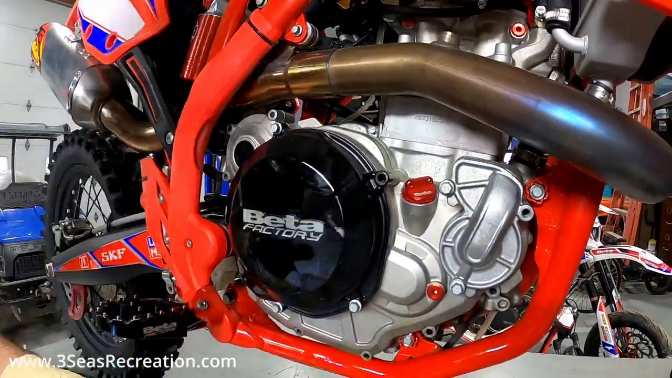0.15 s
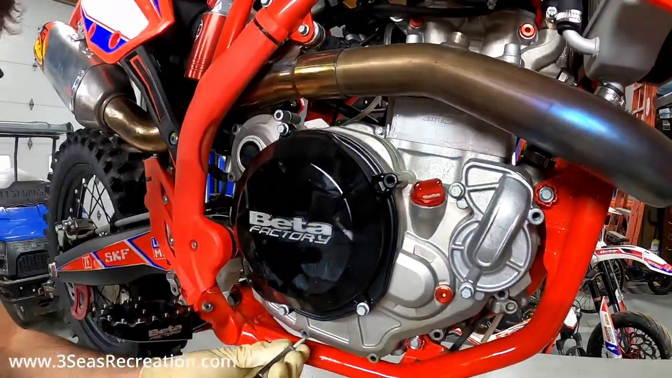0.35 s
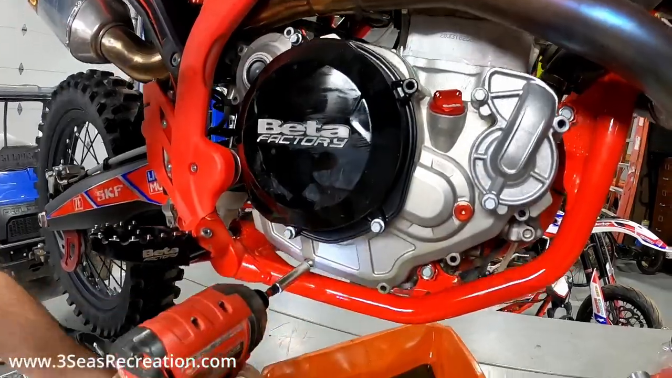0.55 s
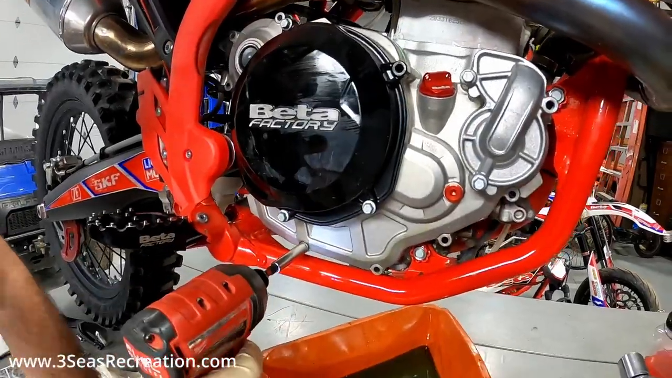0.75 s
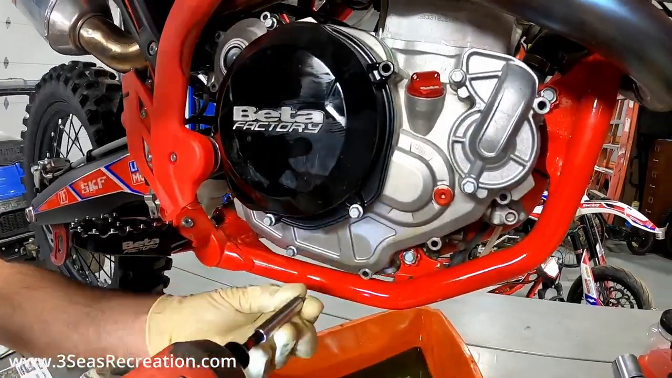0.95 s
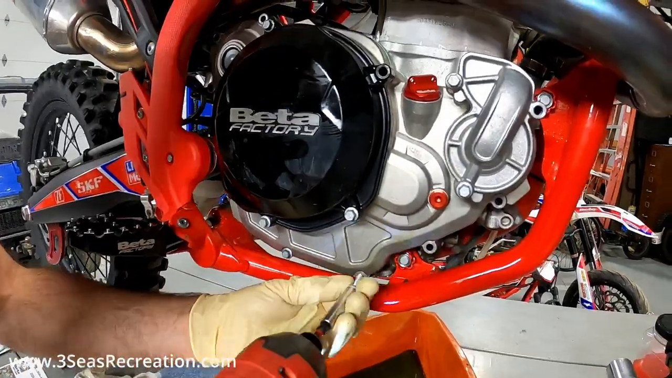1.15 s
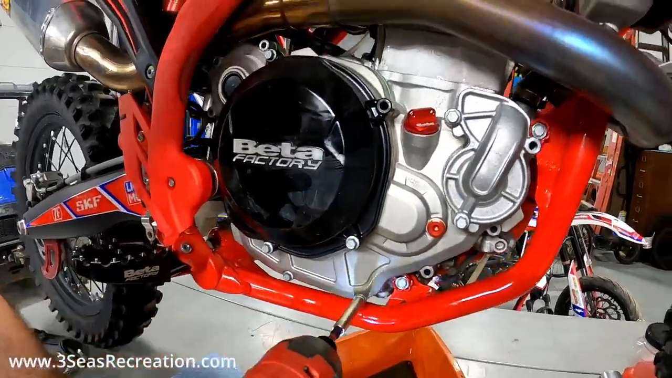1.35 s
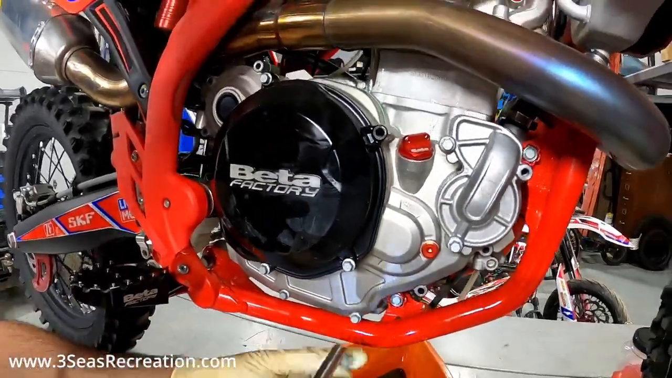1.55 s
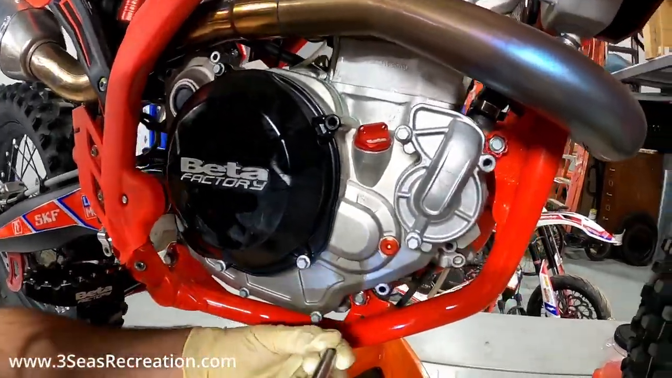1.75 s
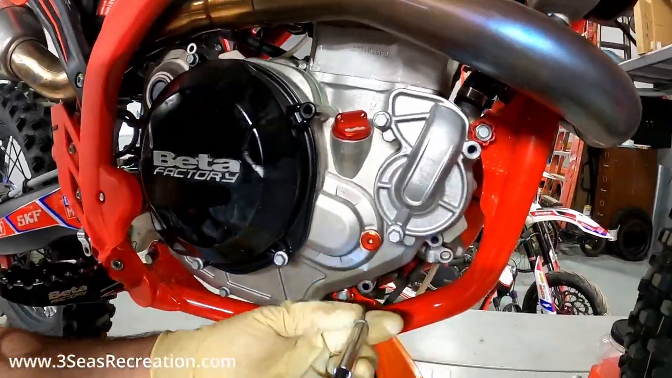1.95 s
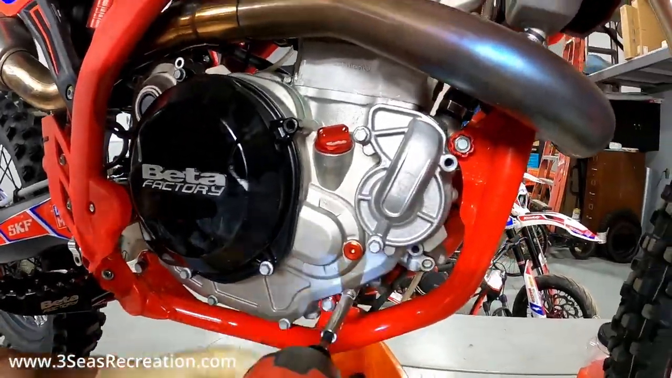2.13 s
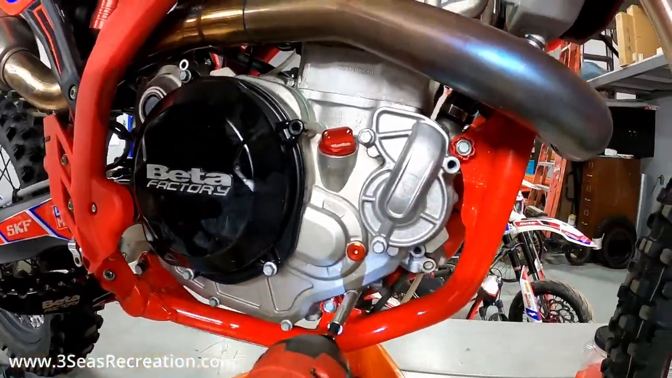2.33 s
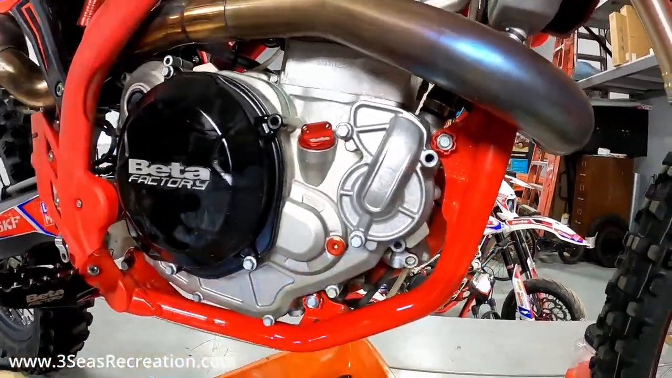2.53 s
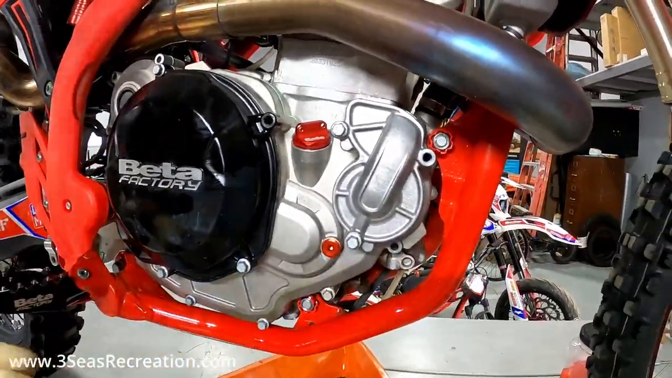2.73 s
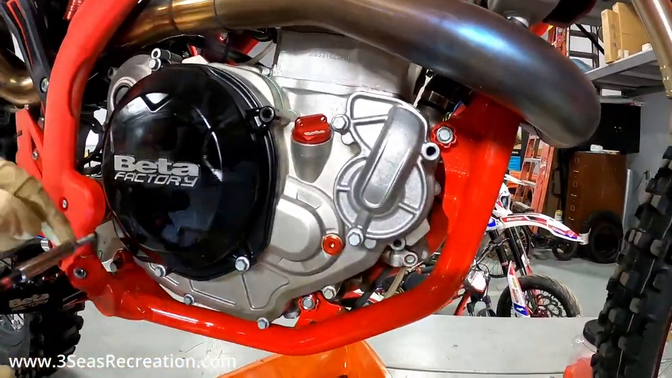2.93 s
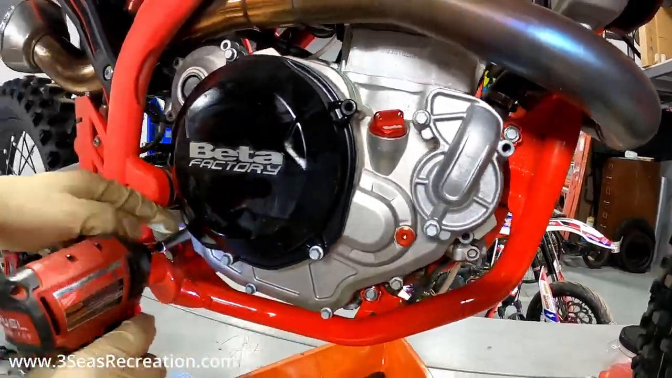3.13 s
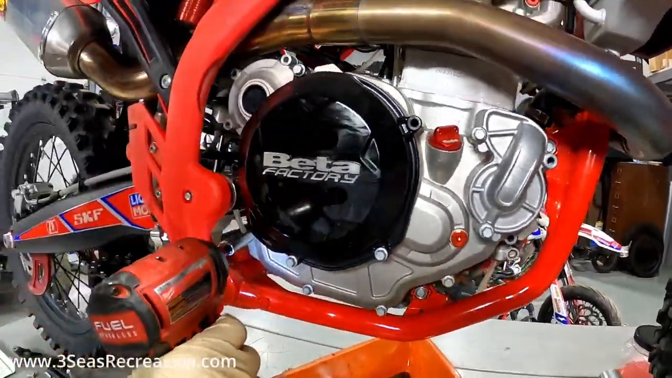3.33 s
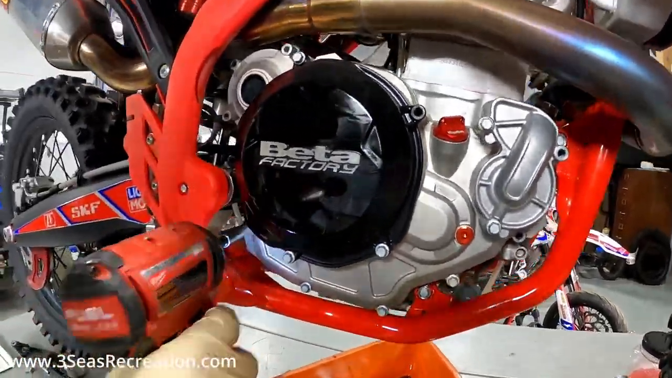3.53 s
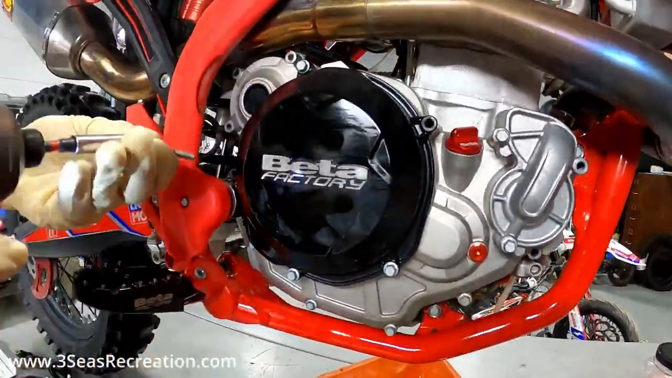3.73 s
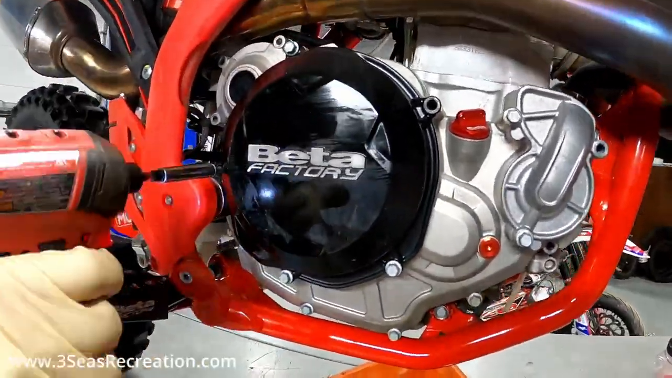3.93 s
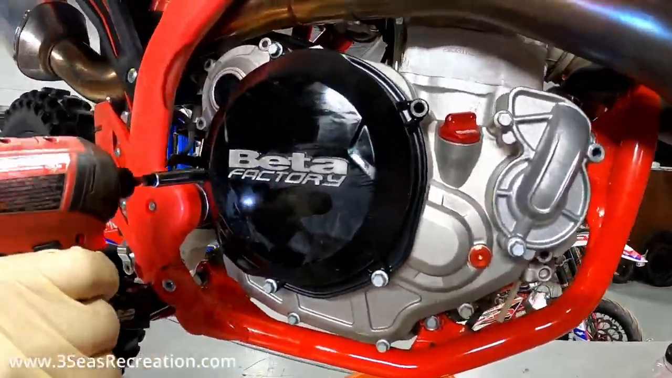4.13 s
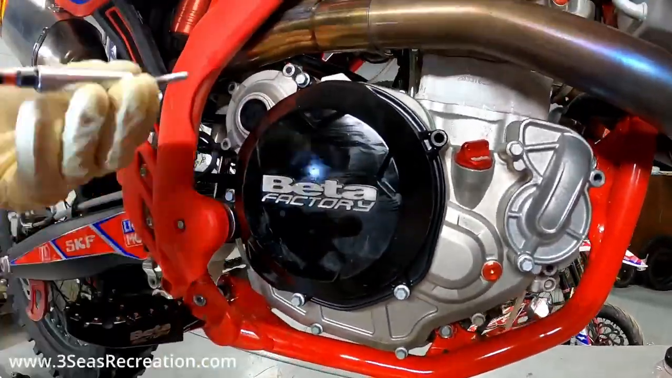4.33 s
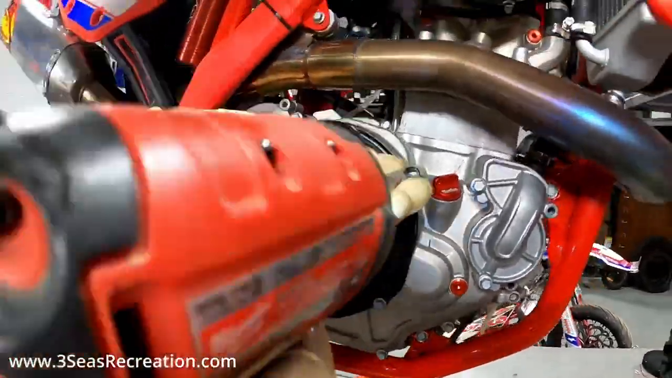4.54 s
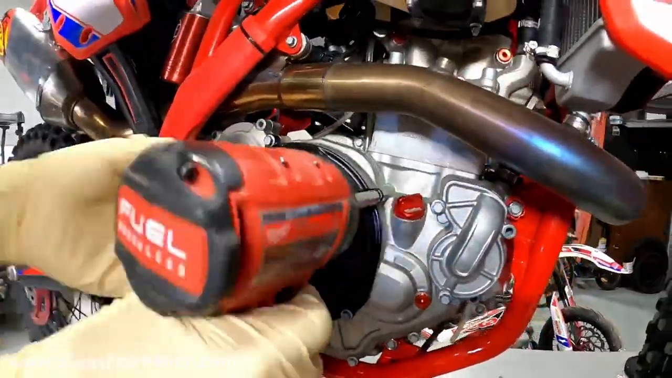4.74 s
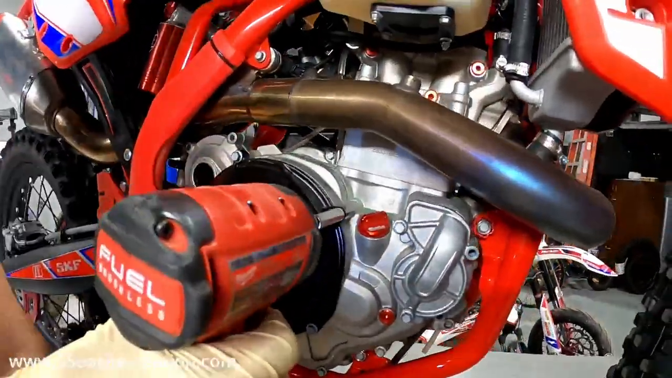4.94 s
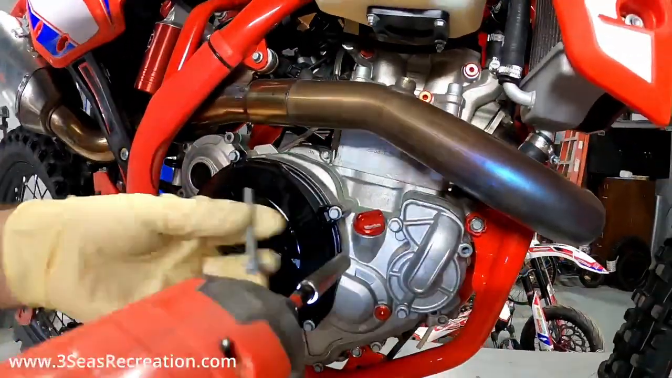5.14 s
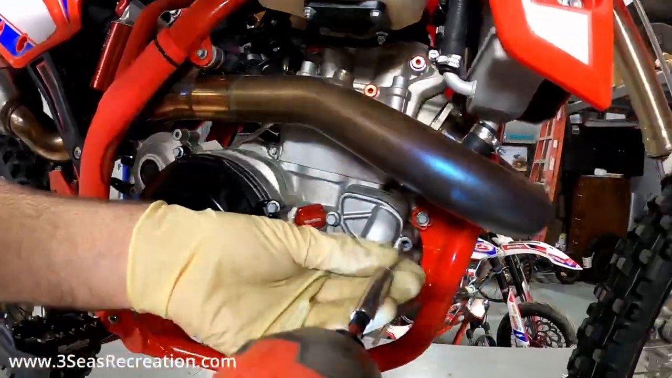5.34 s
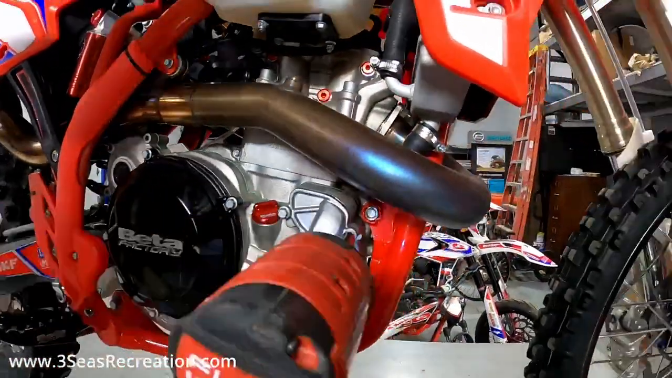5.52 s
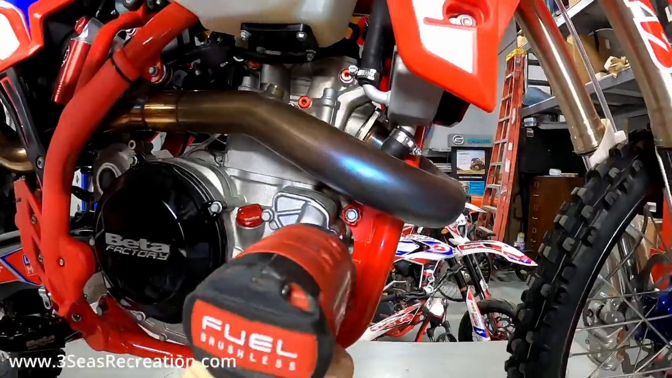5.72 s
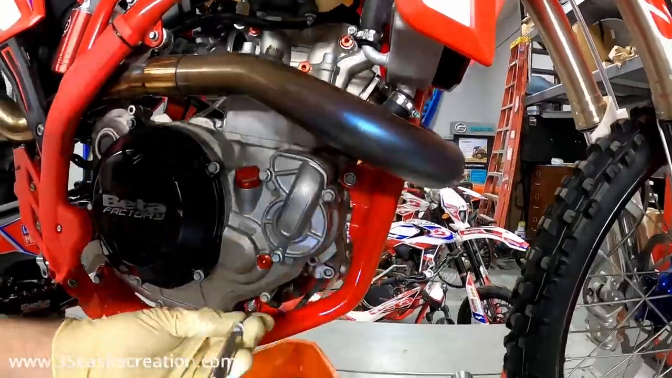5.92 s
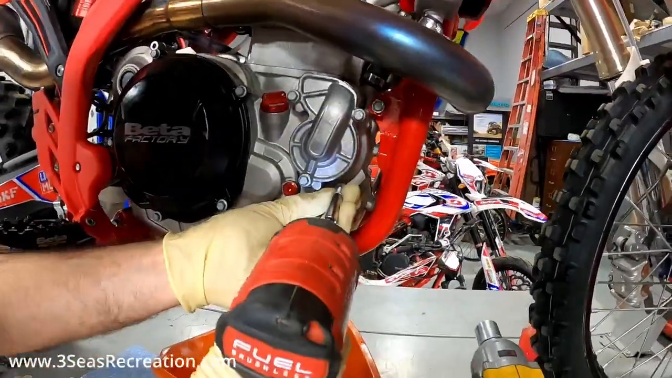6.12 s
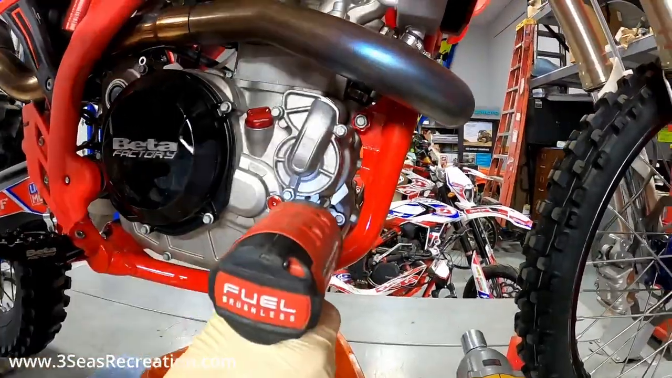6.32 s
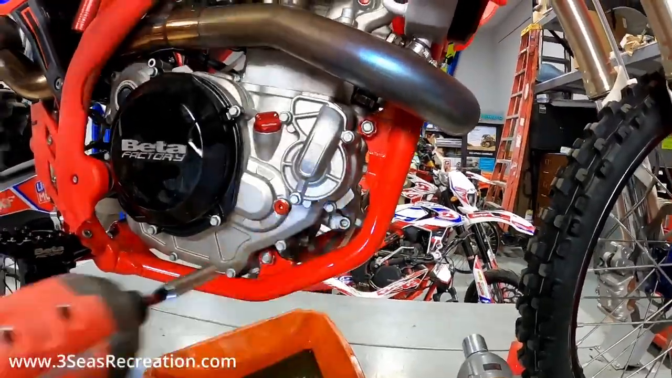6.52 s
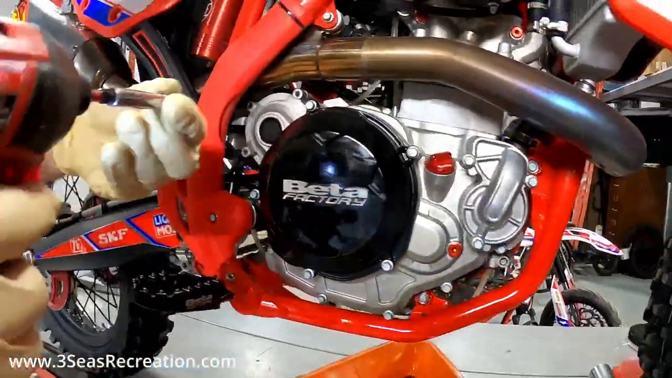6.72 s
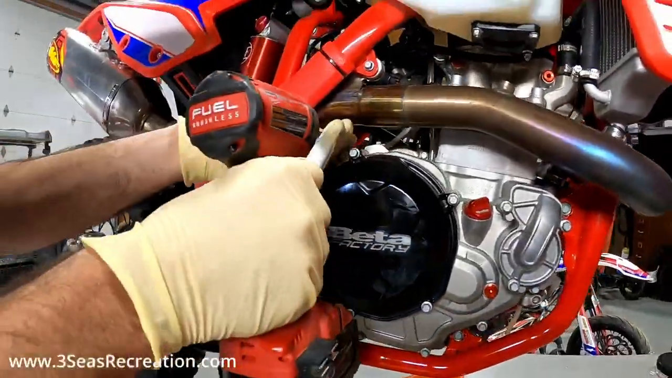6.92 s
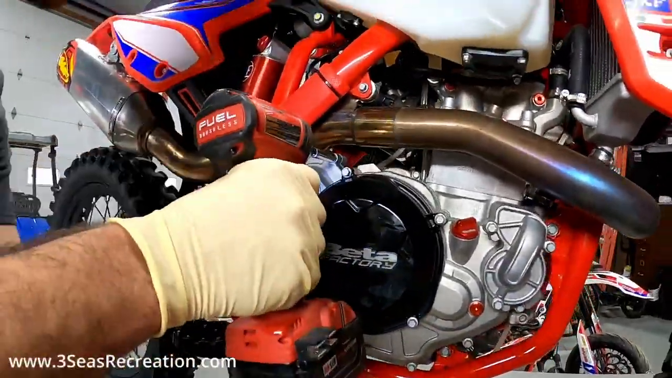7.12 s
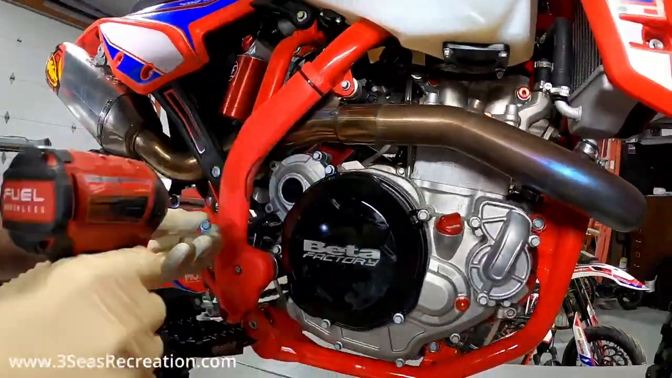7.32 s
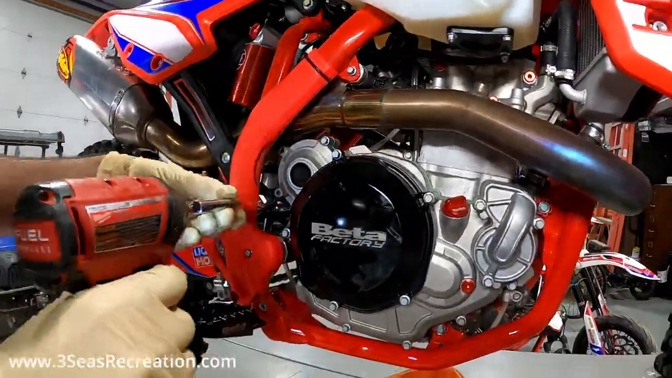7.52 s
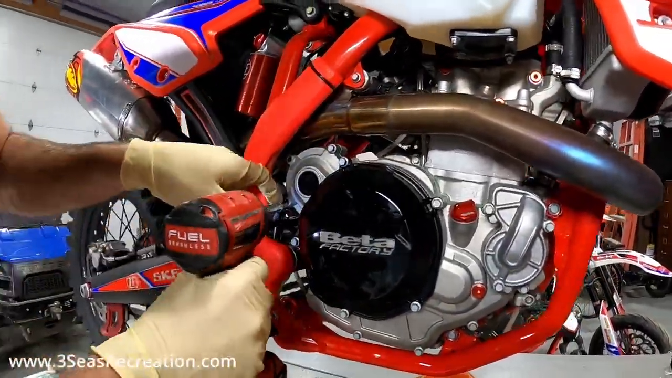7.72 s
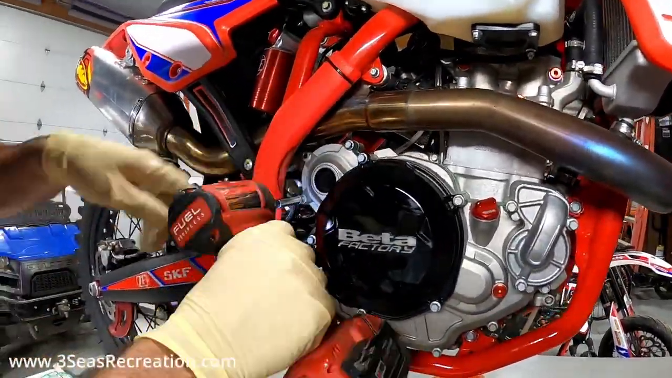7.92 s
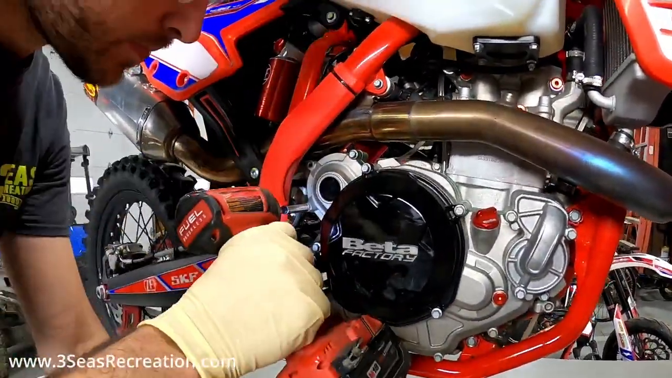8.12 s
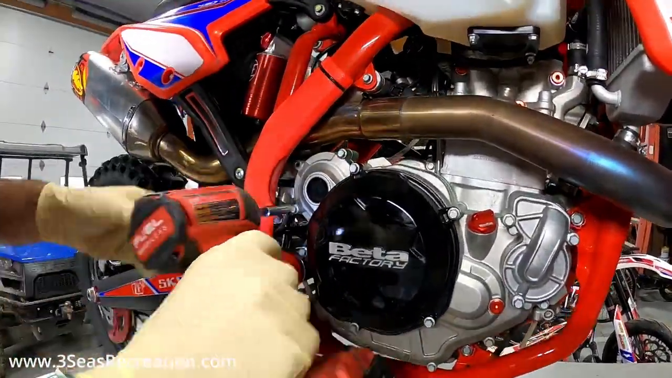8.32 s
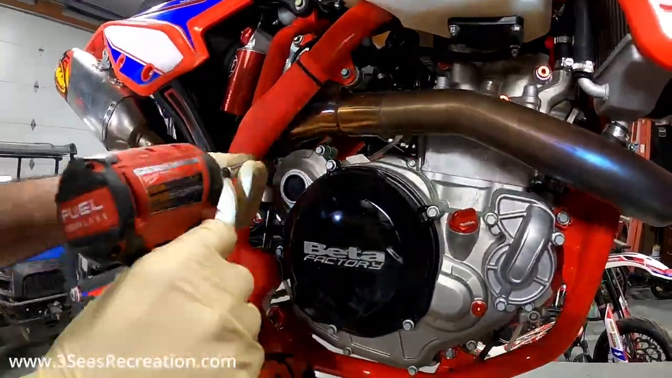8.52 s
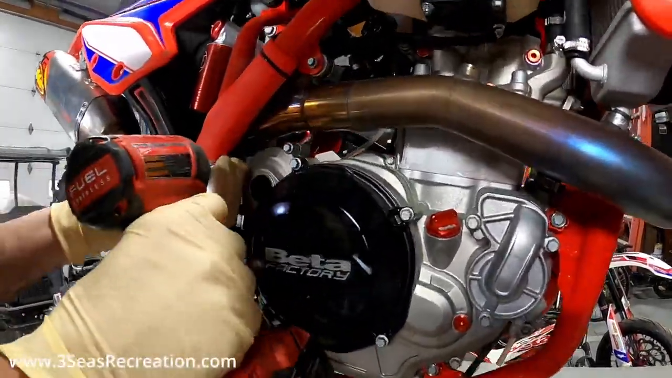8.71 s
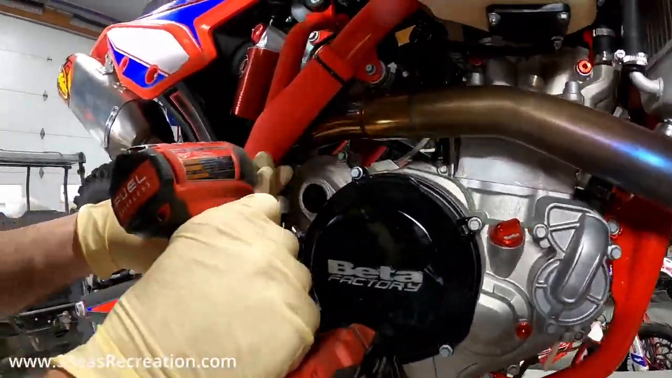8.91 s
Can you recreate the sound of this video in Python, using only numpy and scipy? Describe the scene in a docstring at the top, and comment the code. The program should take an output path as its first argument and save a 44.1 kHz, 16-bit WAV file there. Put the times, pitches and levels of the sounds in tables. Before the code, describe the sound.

Close up in a quiet garage, a steel socket clicks onto a bolt, a cordless driver whirs briefly, and the bolt snaps tight. The pattern repeats again and again, some bursts low and rattly, others higher and faster. Between them come light clinks of loose metal, soft thumps from the motorcycle and a faint rustle of gloves, over soft room noise.

```python
"""A cordless driver blips, clacks onto a bolt, then whirs in burst after burst on a motorcycle's engine cover.
Its motor and meshing gears whine at multiples of the rotation rate, sagging in pitch under load.
Impacts set steel ringing: the socket meets each bolt head, the bolt seats with a snap, loose parts tick.
Gloves rustle by friction, the bike thumps on its stand, and a low rumble comes and goes.
The garage workshop adds soft air noise, a faint hum and a brief reverberation."""
import sys
import numpy as np
from scipy import signal
from scipy.fft import rfft, irfft, next_fast_len
from scipy.io import wavfile
from scipy.ndimage import uniform_filter1d, map_coordinates

SR = 44100
rng = np.random.default_rng(int(sys.argv[2]) if len(sys.argv) > 2 else 0)


def store_pcm(level_fs):
    """Save levels as 16-bit WAV."""
    pcm = np.round(np.clip(level_fs, -1, 1) * 32767).astype(np.int16)
    wavfile.write(sys.argv[1], SR, np.atleast_2d(pcm).T)


N = 399653


def amp(db):
    """Decibels to amplitude ratio."""
    return 10 ** (np.asarray(db) / 20)


def unit(x):
    """Normalisation to rms 1."""
    return x / np.sqrt(np.mean(x ** 2) + 1e-20)


def along(points, hz):
    """Interpolation of (frequency, value) points on a logarithmic frequency axis."""
    point_hz, values = np.transpose(points)
    return np.interp(np.log(hz + 1), np.log(point_hz + 1), values)


def wobble(rate, size):
    """Smooth random modulation: a spline through `rate` Gaussian values a second."""
    knots = rng.standard_normal(int(size * rate / SR) + 4)
    return map_coordinates(knots, [np.arange(size) * rate / SR])


def filtered(x, response):
    """Linear filtering: the spectrum of x times a frequency response."""
    n = x.shape[-1]
    padded = next_fast_len(n + 4096)
    return irfft(rfft(x, padded) * response(np.fft.rfftfreq(padded, 1 / SR)), padded)[..., :n]


def coloured(x, spectrum):
    """Spectral shaping by (frequency_hz, gain_db) points, normalised to rms 1."""
    return unit(filtered(x, lambda hz: amp(along(spectrum, hz))))


# Register boundaries: lower_hz, upper_hz
CROSSOVERS = (1700, 5200)
def registers(x):
    """Complementary filters divide x into low, middle and high bands."""
    low, below_top = [filtered(x, lambda hz: 1 / (1 + (hz / edge) ** 12)) for edge in CROSSOVERS]
    return low, below_top - low, x - below_top


def add(track, start_s, sound):
    """Superposition of a stereo sound on the track."""
    start = round(start_s * SR)
    part = sound[:, max(-start, 0):N - start]
    track[:, max(start, 0):][:, :part.shape[1]] += part


def scattered(x, scatter_db, t60_s):
    """Multipath propagation: each ear gets a direct sound and reflections off engine and frame."""
    t = np.arange(SR // 25) / SR
    paths = rng.standard_normal((2, len(t))) * amp(-60 * t / t60_s)
    paths *= amp(scatter_db) / np.linalg.norm(paths, axis=1, keepdims=True)
    paths[[0, 1], rng.integers(0, 40, 2)] += 1  # direct paths
    paths /= np.linalg.norm(paths, axis=1, keepdims=True)
    return signal.fftconvolve(x[None], paths, axes=1)[:, :len(x)]


# The finger squeezes harder or eases off during a pull: start_s, demanded_speed_hz
SQUEEZES = [(3.305, 350), (4.05, 555), (4.895, 375), (4.945, 565), (5.67, 595), (6.37, 385), (7.146, 580),
            (8.096, 444)]
def motor_speed(t, on, off, first_speed_hz):
    """First-order lag: speed follows the trigger, less thread friction, tightening and braking."""
    lag_s, tighten_s, brake_s = .013, .02, .025
    sag_per_s, tighten_drop = .2, .36  # fractions of the speed
    demanded = np.full(len(t), float(first_speed_hz))
    for start_s, speed_hz in SQUEEZES:
        if on < start_s < off:
            demanded = np.where(t > start_s, speed_hz, demanded)
    pole = np.exp(-1 / (lag_s * SR))
    unloaded = signal.lfilter([1 - pole], [1, -pole], demanded)
    sag = 1 - sag_per_s * (t - on)
    tightening = 1 - tighten_drop * np.exp(np.minimum(t - off, 0) / tighten_s)
    braking = np.exp(-np.maximum(t - off, 0) / brake_s)
    return np.maximum(unloaded * sag * tightening * braking, 1)


# Shaft harmonics: cycles_per_turn, relative_db
SHAFT_ORDERS = [(3, -3), (4, 0), (5, -2)]
def gear_whine(turns, speed_hz):
    """Forced vibration: gear mesh and shaft harmonics swell as they cross the tool's resonance."""
    resonance_hz, half_width_hz, boost_db = 2900, 1000, 4
    mesh_order, backlash_turns = 1.575, .036

    def partials(orders, level_db, rotation):
        resonance_db = boost_db / (1 + ((orders * speed_hz - resonance_hz) / half_width_hz) ** 2)
        flutter_db = 3 * np.array([wobble(55, len(turns)) for _ in orders])
        cycles = orders * rotation + rng.random(orders.shape)
        return np.sum(amp(level_db + resonance_db + flutter_db) * np.sin(2 * np.pi * cycles), axis=0)

    harmonic = np.arange(1, 14)[:, None]
    backlash = backlash_turns * wobble(170, len(turns))  # phase jitter broadens the mesh lines
    mesh = partials(mesh_order * harmonic, np.where(harmonic == 1, -5, 0), turns + backlash)
    orders, shaft_db = np.transpose(SHAFT_ORDERS)[:, :, None]
    return unit(mesh + partials(orders, shaft_db - 1.5, turns))


def gear_rattle(turns, depth=.37, chatter_db=2.5):
    """Amplitude-modulated noise: teeth scrape once a turn and the loose socket chatters."""
    n = len(turns)
    scrape = rng.standard_normal(n) * (1 + depth * np.cos(2 * np.pi * turns))
    return unit(scrape * amp(chatter_db * wobble(420, n) + wobble(68, n)))


def switching_whistle(t, turns, pace, lower_db, upper_db, carrier_hz=9987, carrier_db=-62):
    """Modulation: the speed control chops the current at one rate; the rotor adds two sidebands."""
    def tone(cycles):
        return np.sin(2 * np.pi * (cycles + rng.random((2, 1)) / 4))

    side_gain = pace * amp(2.2 * wobble(50, len(t)))
    cycles = carrier_hz * t
    carrier = amp(carrier_db) * tone(cycles)
    sidebands = amp(lower_db) * tone(cycles - turns) + amp(upper_db) * tone(cycles + turns)
    return carrier + side_gain * sidebands


# Response of the housing: frequency_hz, gain_db
HOUSING_RESPONSE = [(180, -38.5), (300, -22), (600, -14), (950, -8), (1900, -6.5), (2600, 0.5), (3150, 4),
                    (3800, 0), (4450, 0.5), (5300, -17), (7800, -15.5), (8800, -26.5), (11300, -38),
                    (14200, -38.5), (15400, -63.5)]
# Trigger pulls, with levels at the reference speed: on_s, off_s, demanded_speed_hz, gear_db,
# case_re_gear_db, treble_re_gear_db, lower_sideband_db, upper_sideband_db
TRIGGER_PULLS = [(0.0, 0.048, 206, -28.5, -3, -9, -50, -54),
                 (0.596, 0.881, 345, -29.5, -7.5, -8.5, -50, -53),
                 (1.296, 1.492, 431, -28, -8.5, -7, -44, -66),
                 (2.197, 2.412, 461, -28.5, -6.5, -6.5, -42.5, -57),
                 (3.255, 3.553, 104, -27.5, -6.5, -8, -40.5, -48),
                 (3.995, 4.242, 164, -29.5, -4.5, -7.5, -57, -50),
                 (4.851, 5.076, 592, -28.5, -5, -4, -38.5, -50.5),
                 (5.6, 5.789, 653, -28, -10, -7.5, -49.5, -58),
                 (6.295, 6.48, 680, -29.5, -9.5, -7, -53, -53.5),
                 (7.047, 7.263, 333, -29.5, -10.5, -7.5, -50.5, -52),
                 (8.039, 8.27, 125, -29, -7.5, -11.5, -49.5, -52),
                 (8.93, 8.997, 150, -31, -4.5, -9.5, -49, -45), (9.022, 9.05, 310, -25, -12, -9, -63, -62)]
def driver(reference_speed_hz=450, slack_db=-2, slack_s=.0072):
    """Structure-borne sound: gears shake housing and engine cover, louder and brighter with speed."""
    out = np.zeros((2, N))
    for on, off, first_speed_hz, gear_db, case_db, treble_db, lower_db, upper_db in TRIGGER_PULLS:
        t = np.arange(on - .03, off + .06, 1 / SR)
        speed_hz = motor_speed(t, on, off, first_speed_hz) * (1 + .011 * wobble(70, len(t)))
        turns = np.cumsum(speed_hz) / SR
        pace = speed_hz / reference_speed_hz
        whine = amp(-.3) * gear_whine(turns, speed_hz)
        gearbox, socket = gear_rattle(turns), gear_rattle(turns)
        radiated = sum(scattered(part, scatter_db=-2, t60_s=.04) for part in (gearbox, socket, whine))
        case, mesh, treble = map(unit, registers(coloured(radiated, HOUSING_RESPONSE)))
        shudder_db = 2.4 * wobble(46, len(t))
        gears = pace ** 1.045 * mesh + amp(case_db + shudder_db) * pace * case
        gears += amp(treble_db) * pace ** 1.2 * treble
        whistle = switching_whistle(t, turns, pace, lower_db, upper_db)
        envelope = amp(-60 * np.maximum(on - t, 0) / .031 - 60 * np.maximum(t - off, 0) / .061)
        bite = amp(slack_db * np.exp(-np.maximum(t - on, 0) / slack_s))  # the gears take up slack
        add(out, t[0], envelope * bite * (amp(gear_db) * gears + whistle))
    return out


# Spectrum of the rumble: frequency_hz, density_db
RUMBLE_SPECTRUM = [(12, -29.5), (20, -8), (64, -2.5), (102, -2.5), (157, -8.5), (247, -14.5), (300, -12),
                   (390, -36.5), (660, -120)]
# Swells of the rumble: peak_s, relative_db
RUMBLE_SWELLS = [(0, -65.5), (.66, -64.5), (1.36, -63), (2.24, -55.5), (2.75, -64), (3.13, -58), (3.6, -57),
                 (4.2, -63), (4.92, -49.5), (5.7, -54.5), (6.35, -60), (7.141, -70), (8.18, -57.5),
                 (9.06, -55)]
def rumble(slope_db_per_s=49, floor_db=-77):
    """Low-frequency noise grows and decays exponentially about each peak, above a floor."""
    t = np.arange(N) / SR
    swell_db = np.max([db - slope_db_per_s * np.abs(t - s) for s, db in RUMBLE_SWELLS], axis=0)
    noise = rng.standard_normal((2, N)) * amp(2.8 * wobble(6, N))
    return amp(np.maximum(swell_db, floor_db) + 10.5) * coloured(noise, RUMBLE_SPECTRUM)


# Spectrum of the workshop's air noise: frequency_hz, density_db
AIR_SPECTRUM = [(15, -33.5), (25, -5), (93, -8.5), (158, 8), (224, -5), (293, -1.5), (344, -8), (637, -25),
                (709, -21.5), (2240, -38), (3090, -35.5), (4150, -29), (4620, -30.5), (7680, -41),
                (15000, -52.5)]
def room_tone(air_db=-60, hum_db=-69, hum_hz=290, half_width_hz=5):
    """Stationary noise: a broad band is heard as soft air, a narrow band as a faint hum."""
    noise = rng.standard_normal((2, N))
    hum = unit(filtered(noise, lambda hz: 1 / (1 + ((hz - hum_hz) / half_width_hz) ** 2)))
    air = coloured(rng.standard_normal((2, N)), AIR_SPECTRUM)
    return amp(air_db) * air + amp(hum_db) * hum


# Reverberation time of the workshop: frequency_hz, t60_s
REVERB_TIMES = [(200, .35), (1000, 0.21), (4000, 0.23), (7000, 0.16), (11000, 0.2)]
def reverberation(x):
    """A diffuse field decays exponentially, the bass lasting longest."""
    hz, t, spectra = signal.stft(rng.standard_normal((2, SR // 2)), SR, nperseg=256)
    decay = amp(-60 * t / along(REVERB_TIMES, hz)[:, None])
    tail = signal.istft(spectra * decay, SR, nperseg=256)[1]
    return signal.fftconvolve(x, tail / np.linalg.norm(tail[0]), axes=1)[:, :N]


# Joint modes of socket and bolt: pitch_hz, level_db, t60_s
STEEL_MODES = [(2317, 4.5, 0.075), (2790, 6, 0.025), (4030, -11.5, 0.028), (4350, -4.5, .07),
               (7860, -15.5, 0.091), (12880, -25, 0.067)]
# Spectrum of steel contact: frequency_hz, density_db
CONTACT_SPECTRUM = [(88, -29), (150, -4), (284, -10), (810, -4), (945, 1), (1790, -3.5), (2800, -3),
                    (4540, -10.5), (7670, -21), (9300, -29.5), (12900, -44.5), (15400, -52.5)]
def impacts(events, low_db, middle_db, high_db, ring_db, clank_db, rise_s, t60_s):
    """Impact excitation: steel cracks, the socket rings, the case clanks; harder means brighter."""
    out = np.zeros((2, N))
    t = np.arange(-SR // 50, SR // 5) / SR  # contact is at t = 0
    after = np.maximum(t, 0)
    for start_s, level_db, hardness_db, case_hz in events:
        contact = amp(-60 * after / t60_s + 60 * np.minimum(t, 0) / rise_s)
        snap = amp(6 - 60 * np.abs(t - .002) / .007)
        crack = coloured((contact + snap) * rng.standard_normal(len(t)), CONTACT_SPECTRUM)
        ring = np.zeros(len(t))
        for pitch_hz, mode_db, mode_t60_s in STEEL_MODES:
            decay = amp(mode_db + rng.normal(0, 3) - 60 * after / mode_t60_s)
            ring += decay * np.sin(2 * np.pi * pitch_hz * rng.normal(1, .03) * after)
        clank = contact * np.sin(2 * np.pi * case_hz * t)
        blow = crack + amp(ring_db) * unit(ring) + amp(clank_db) * unit(clank)
        bands = registers(scattered(blow, scatter_db=2.5, t60_s=.011))
        # each band is scaled to a peak power of 1, averaged over 5 ms
        powers = [uniform_filter1d(np.mean(band ** 2, axis=0), size=220).max() for band in bands]
        low, middle, high = [band / np.sqrt(power) for band, power in zip(bands, powers)]
        body = amp(low_db - hardness_db) * low + amp(middle_db) * middle
        tick = amp(high_db + hardness_db - 60 * after / .12) * high  # the treble dies first
        add(out, start_s + t[0], amp(level_db) * (body + tick))
    return out


# Knocks of the socket: start_s, level_db, hardness_db, case_pitch_hz
KNOCKS = [(.082, -40, 6.5, 1430), (.418, -53.5, -6.5, 1420), (.46, -58, -4, 1200), (.48, -30.5, 2, 775),
          (.526, -37, -2.5, 1080), (.539, -30, 3.5, 1120), (1.23, -43, -1, 830), (1.252, -37, -6.5, 1000),
          (1.513, -40.5, 0, 1620), (2.129, -48.5, -6.5, 1200), (2.151, -42.5, -4.5, 1000),
          (2.166, -37, -5.5, 1320), (2.477, -31.5, 4.5, 1490), (2.503, -35.5, 3.5, 1470),
          (3.163, -51.5, -5, 1620), (3.191, -28, 5.5, 980), (3.2, -35.5, -7.5, 558),
          (3.254, -35.5, 0, 1395), (3.861, -45.5, -8, 910), (3.903, -46, -8, 1280), (3.938, -34, -4, 598),
          (3.955, -32, -3, 996), (3.966, -30, 0, 970), (3.985, -30.5, -2, 554), (4.737, -46, -7.5, 930),
          (4.758, -28.5, -2, 643), (4.771, -25.5, 1, 672), (4.803, -34.5, 0.5, 1190),
          (5.334, -56.5, -13.5, 1094), (5.473, -51, -9, 1100), (5.502, -31.5, -5, 1285),
          (5.522, -31, 3.5, 740), (5.537, -29.5, -5.5, 1035), (6.225, -32.5, -4.5, 1273),
          (6.242, -31, 2, 735), (7.008, -33.5, -2, 1012), (7.917, -45.5, -5, 1380),
          (7.953, -35, -0.5, 1280), (8.813, -35.5, 3, 715), (8.832, -36.5, 2, 496),
          (8.858, -43.5, -1, 1370)]
def socket_knocks():
    """Collision: the socket meets a bolt head or the cover and excites the case resonance."""
    return impacts(KNOCKS, low_db=1, middle_db=.5, high_db=-6,
                   ring_db=-12.5, clank_db=-6, rise_s=.031, t60_s=.06)


# Spectrum of glove friction: frequency_hz, density_db
GLOVE_SPECTRUM = [(290, -40.5), (500, -8), (990, -0.5), (1230, 6), (2260, -1), (2680, -3.5), (7680, -11.5),
                  (10800, -32.5), (13200, -24.5), (15000, -43)]
# Strokes of a glove over the tool: centre_s, half_width_s, relative_db
GLOVE_STROKES = [(0.259, 0.052, -58.5), (0.933, 0.17, -65), (1.56, 0.17, -74), (2.0, 0.058, -69.5),
                 (2.73, 0.078, -62.5), (2.88, 0.034, -58.5), (3.716, 0.057, -64), (4.408, 0.059, -63.5),
                 (4.712, 0.042, -63.5), (5.305, .05, -64), (5.96, 0.055, -64), (6.83, 0.018, -66),
                 (7.386, 0.046, -108), (8.73, 0.18, -69)]
def gloves(grip_db=-71.5):
    """Friction noise: gloves crinkle in soft strokes and never lie quite still."""
    t = np.arange(N) / SR
    crinkle = rng.standard_normal((2, N)) * amp(2.5 * wobble(24, N) + 2.5 * wobble(350, N))
    strokes = sum(amp(db) * np.exp(-((t - s) / half_s) ** 2) for s, half_s, db in GLOVE_STROKES)
    return amp(3.5) * (amp(grip_db) + strokes) * coloured(crinkle, GLOVE_SPECTRUM)


# The bike rocks under the tool: start_s, relative_db
THUMPS = [(.52, -33.5), (0.83, -45), (1.166, -42), (1.318, -47), (1.483, -39.5), (2.47, -44), (3.411, -39),
          (4.864, -45), (5.496, -33), (6.237, -33), (7.052, -40), (7.254, -38.5), (7.952, -39),
          (8.322, -35.5), (8.852, -36), (9.021, -34)]
def frame_thumps(mean_pitch_hz=103, rise_s=.004, t60_s=.14, gain_db=6):
    """Damped oscillation: the bike's frame answers each push with a dull thump."""
    out = np.zeros((2, N))
    t = np.arange(SR // 3) / SR
    swell = 1 - np.exp(-t / rise_s)
    for start_s, level_db in THUMPS:
        pitch_hz = mean_pitch_hz * rng.normal(1, .21)
        swing = np.sin(2 * np.pi * (pitch_hz * t + rng.random((2, 1))))
        add(out, start_s, amp(level_db + gain_db - 60 * t / t60_s) * swell * swing)
    return out


# Snaps of seating bolts: start_s, relative_db, hardness_db, case_pitch_hz
SEATS = [(.834, -25, 4, 1135), (2.415, -26, -6.5, 804), (4.222, -22, -0.5, 1516), (4.236, -23.5, 3, 1226),
         (5.058, -21, -2.5, 1358), (6.461, -20.5, -2.5, 1385), (7.262, -28.5, -5, 1397),
         (8.316, -22.5, 3, 1356), (8.324, -18.5, 0.5, 1000), (9.029, -23.5, 1.5, 1396),
         (9.039, -25, 4, 1522)]
def seating_snaps():
    """Impulsive loading: as a bolt seats, the driver's hammer strikes its anvil."""
    return impacts(SEATS, low_db=-7.5, middle_db=-5.5, high_db=-11,
                   ring_db=-12, clank_db=-18.5, rise_s=.067, t60_s=.085)


# Clear ticks of the socket as the tool is carried on: start_s, level_db
TICKS = [(0.969, -42), (1.056, -50.5), (1.69, -55), (1.717, -53.5), (1.928, -46.5), (2.694, -50.5),
         (2.742, -47.5), (2.978, -48.5), (3.085, -54.5), (3.584, -51.5), (3.743, -41), (3.769, -43.5),
         (3.792, -39.5), (4.46, -54), (5.19, -59), (5.294, -39.5), (5.995, -56), (6.835, -60.5),
         (7.328, -59), (7.44, -66), (7.784, -56), (8.624, -41.5)]
def socket_ticks(faint_count=22, faint_db=-56.5, spread_db=8.5, hardness_db=4.5, case_hz=1383):
    """Mechanical play: the socket rattles on its bit, in clear ticks and faint random ones."""
    draws = rng.random((faint_count, 2))
    faint = [(when * N / SR, faint_db - spread_db * softness) for when, softness in draws]
    events = [(start_s, level_db, hardness_db, case_hz) for start_s, level_db in TICKS + faint]
    return impacts(events, low_db=.5, middle_db=.2, high_db=-5.5,
                   ring_db=-13.5, clank_db=-7.5, rise_s=.03, t60_s=.037)


# A loose bolt clinks in the socket: start_s, level_db
CLINKS = [(2.475, -47), (3.744, -26.5), (3.768, -45.5), (5.296, -43)]
def bolt_clinks():
    """Free vibration: a loose bolt rings briefly in two bending modes."""
    modes = [(4880, 1.5, .024), (13000, -26, .076)]  # pitch_hz, level_db, t60_s
    out = np.zeros((2, N))
    t = np.arange(SR // 5) / SR
    ring = sum(amp(db - 60 * t / t60_s) * np.sin(2 * np.pi * hz * t) for hz, db, t60_s in modes)
    for start_s, level_db in CLINKS:
        add(out, start_s, amp(level_db) * scattered(ring, scatter_db=-7, t60_s=.013))
    return out


def scene():
    """Superposition of the work, its reverberation and the background, in stereo."""
    work = socket_knocks() + seating_snaps() + socket_ticks() + driver() + bolt_clinks()
    background = frame_thumps() + gloves() + rumble() + room_tone()
    balance_db = [[1], [-1]]  # a little to the left
    return (work + amp(-21.5) * reverberation(work) + background) * amp(balance_db)


def record(dry, cutoff_hz=15700):
    """Band limiting: an ideal low-pass filter removes the highest treble."""
    return filtered(dry, lambda hz: hz < cutoff_hz)


dry = scene()
out = record(dry)
store_pcm(out)
```